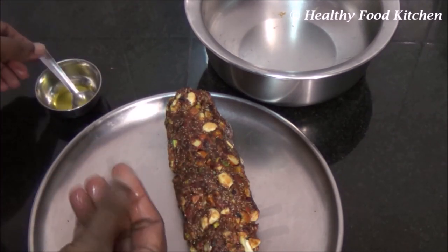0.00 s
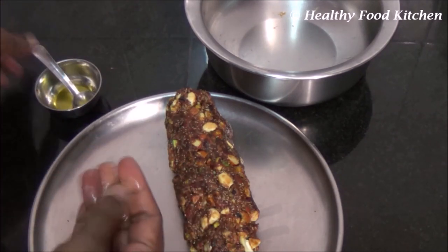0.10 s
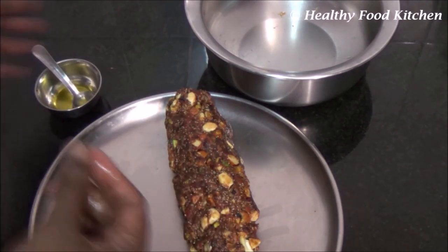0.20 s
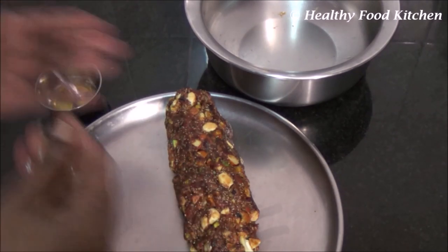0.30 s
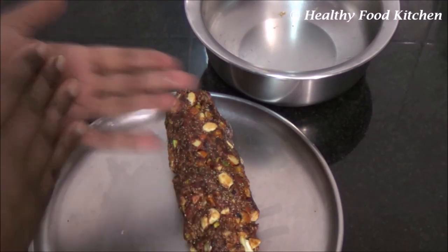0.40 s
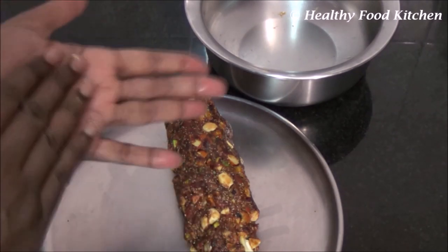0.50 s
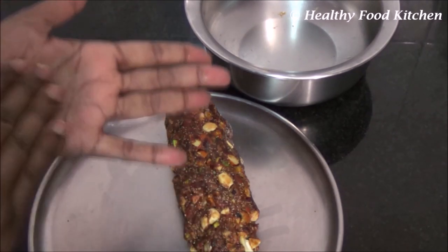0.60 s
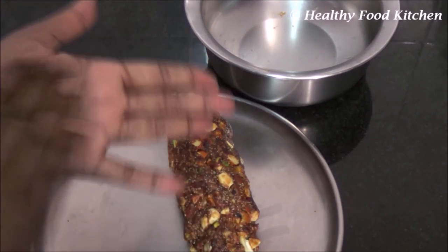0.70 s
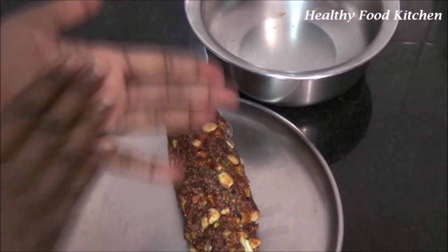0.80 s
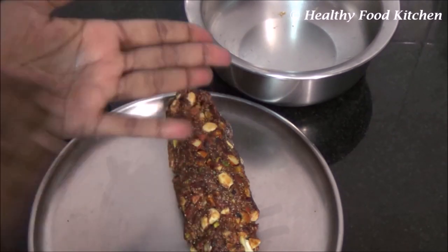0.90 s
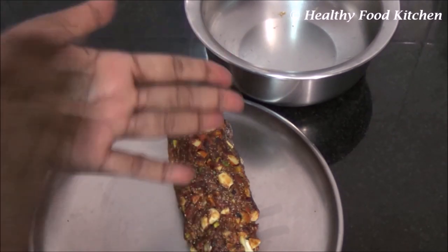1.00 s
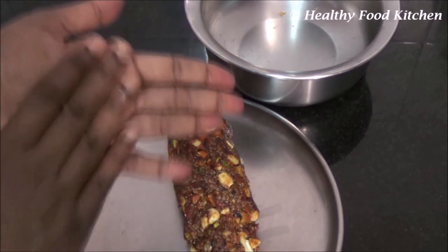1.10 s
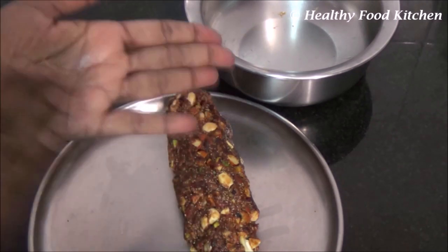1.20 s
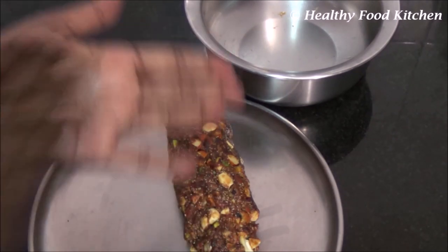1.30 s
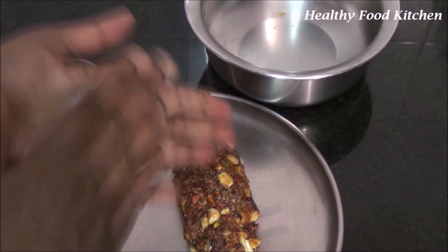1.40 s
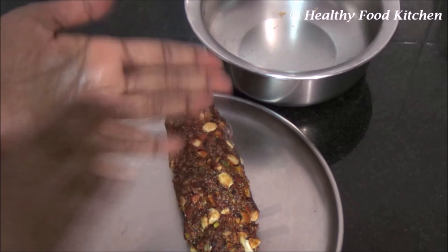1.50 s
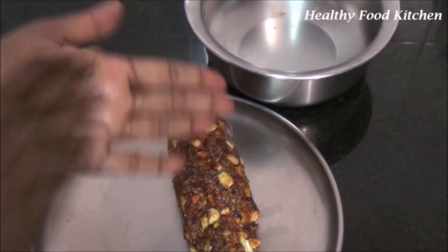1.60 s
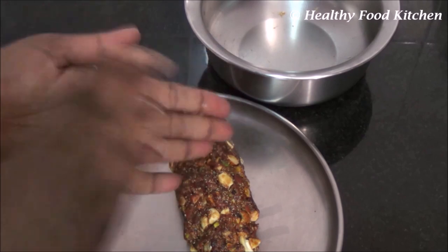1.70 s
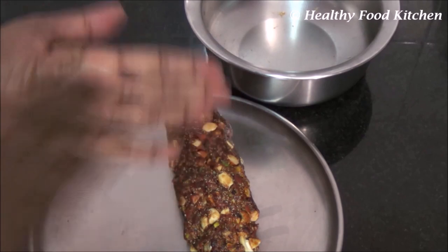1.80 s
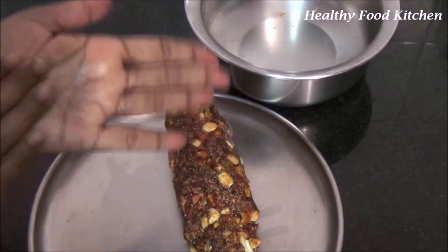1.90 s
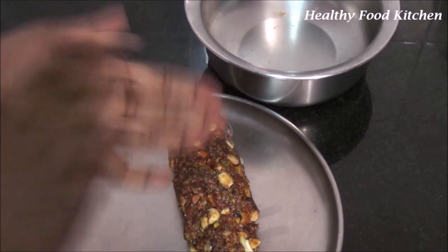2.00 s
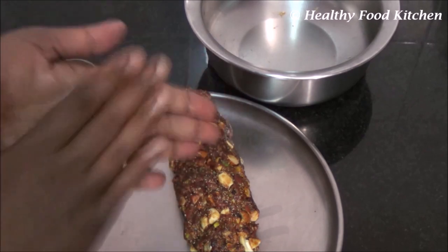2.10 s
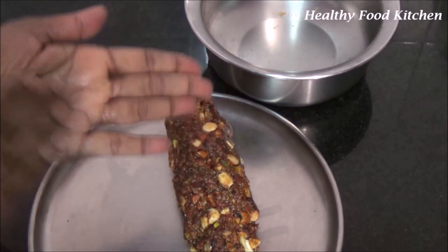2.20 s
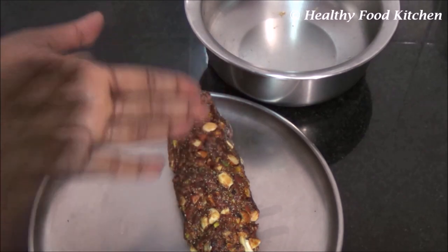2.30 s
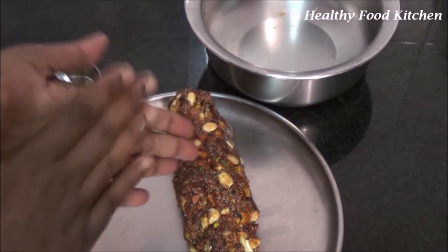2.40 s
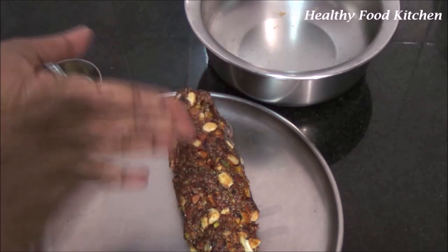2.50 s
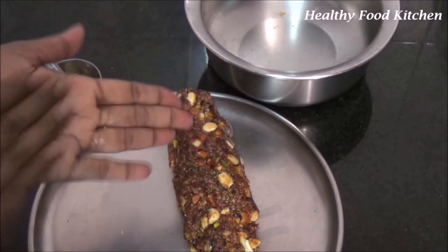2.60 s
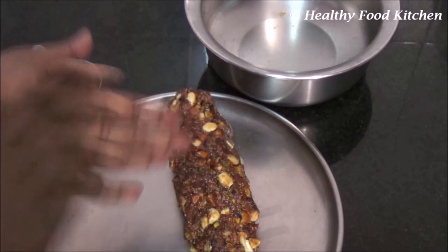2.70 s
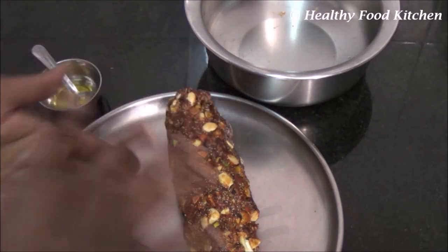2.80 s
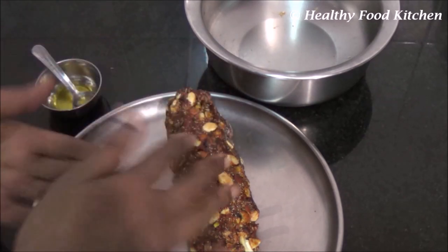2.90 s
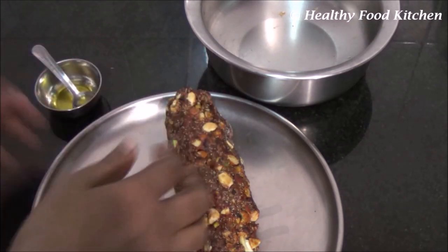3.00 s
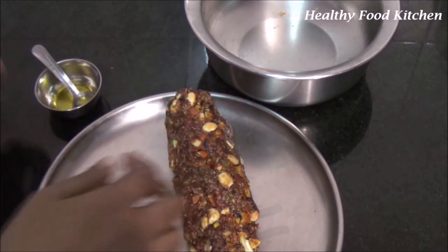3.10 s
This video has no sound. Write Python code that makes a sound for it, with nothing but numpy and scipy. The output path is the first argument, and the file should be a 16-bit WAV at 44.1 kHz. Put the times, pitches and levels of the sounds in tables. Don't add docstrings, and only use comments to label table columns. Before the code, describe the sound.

Two oiled palms rub together in quick strokes after one sharp click, over a low fridge hum.

```python
import sys
import numpy as np
from scipy import signal
from scipy.fft import rfft, irfft
from scipy.io import wavfile
from scipy.ndimage import uniform_filter1d

SR = 44100
rng = np.random.default_rng(int(sys.argv[2]) if len(sys.argv) > 2 else 0)


def elevation(decibels):
    levels = np.asarray(decibels, float)
    return 10 ** (levels / 20)


def persist_wave(psi):
    counts = np.round(np.clip(psi, -1, 1) * 32767).astype(np.int16)
    wavfile.write(sys.argv[1], SR, np.atleast_2d(counts).T)


N = 141120


def evened(x):
    return x / np.sqrt(np.mean(x ** 2) + 1e-20)


def read(points, hz):
    f, value = np.transpose(points)
    return np.interp(np.log(hz + 1), np.log(f + 1), value)


def slow(rate_hz):
    t = np.arange(0, N + 64, 64) / SR
    wave = 0
    for f in rate_hz * np.geomspace(.05, 1, num=24):
        wave = wave + np.sin(2 * np.pi * (f * t + rng.random())) / np.sqrt(f)
    return np.interp(np.arange(N) / SR, t, evened(wave))


def resonate(x, hz, width):
    turn = np.exp(2j * np.pi * np.cumsum(hz * np.ones(len(x))) / SR)
    r = np.exp(-np.pi * width / SR)
    return 2 * (turn * signal.lfilter([1 - r], [1, -r], x / turn + 1e-18)).real


def colour(x, points, patchy_db, streak_db):
    hz, _, z = signal.stft(x, SR, nperseg=512, noverlap=384)
    a, b = rng.standard_normal((2,) + z.shape[-2:])
    patches = evened(uniform_filter1d(uniform_filter1d(a, size=7, axis=0), size=12, axis=1))
    streaks = evened(uniform_filter1d(uniform_filter1d(b, size=2, axis=0), size=9, axis=1))
    gain = elevation(read(points, hz)[:, None] + patchy_db * patches + streak_db * streaks)
    return signal.istft(z * gain, SR, nperseg=512, noverlap=384)[1][..., :N]


def alike(a, b, points, hz):
    same = np.clip(read(points, hz), 0, 1).reshape((-1,) + (1,) * (a.ndim - 1))
    return np.array([a, same * a + np.sqrt(1 - same ** 2) * b])


# frequency in Hz, left-right likeness from 0 to 1.
BACKGROUND_SAME = [(40, 0.96), (150, 0.95), (400, 0.61), (900, 0.12), (2500, 0.29), (6000, 0.3),
                   (9000, .85), (13000, 0.93)]


def pair(points):
    hz = np.fft.rfftfreq(N, 1 / SR)
    a, b = rfft(rng.standard_normal((2, N)))
    return evened(irfft(alike(a, b, BACKGROUND_SAME, hz) * elevation(read(points, hz)), N))


# multiple of the shaft speed, rms level in dB, waver in dB.
ORDERS = [(1, -63.5, 1.2), (3, -73, 2.), (5, -71, 2.), (6, -48, 1.1), (7, -57, 2.2), (8, -72, 2.5),
          (27, -72, 1.5), (74, -71.5, 3.5)]
# frequency in Hz, rms level in dB, width in Hz.
WHINES = [(120, -66.5, 4.2), (278, -63, 21), (363.7, -67.5, 6.3), (458.6, -65, 17.5), (627, -68.5, 7.6),
          (778, -72.5, 2.9), (835, -71.5, 6.1), (940, -68.5, 18), (6400, -73, 60)]
# frequency in Hz, level in dB per Hz.
RUMBLE = [(22, -3), (40, -15), (62, 1), (85, -7.5), (130, -0.5), (230, -1), (400, -1), (600, -43)]
SHAFT_HZ, SHAFT_WANDER = 49.23, .0006
RUMBLE_DB = -57.5


def fridge():
    turns = np.cumsum(SHAFT_HZ * (1 + SHAFT_WANDER * slow(3.46))) / SR
    out = elevation(RUMBLE_DB) * pair(RUMBLE)
    for k, db, waver_db in ORDERS:
        level = np.sqrt(2) * elevation(db + waver_db * slow(16.))
        out += level * np.sin(2 * np.pi * (k * turns + rng.random()))
    for hz, db, width in WHINES:
        out += elevation(db) * evened(resonate(rng.standard_normal(N), hz, width))
    return out


def screen():
    screen_hz, screen_db = 15624, -75
    return elevation(screen_db) * np.sqrt(2) * np.sin(2 * np.pi * screen_hz * np.arange(N) / SR)


# frequency in Hz, level in dB per Hz.
AIR = [(240, -23), (480, -2), (950, -7), (1500, -10.5), (2700, -9.5), (4100, -15), (12500, -22),
       (15800, -26)]
AIR_DB = -53.5


def room_air():
    flat = [(100, 0), (9000, 0)]
    return elevation(AIR_DB) * colour(pair(AIR), flat, patchy_db=2.1, streak_db=1.35)


CRACKLE_DECAY_S, RING_DECAY_S = .0005, .0007
CLICK_LOW_HZ, CLICK_TOP_HZ = 2200, 13600


def clicks(rows, ring_db, low_share):
    t, out = np.arange(300) / SR, np.zeros(N)
    for s, peak_db, ring_hz in rows:
        edges = [max(CLICK_LOW_HZ, low_share * ring_hz), max(CLICK_TOP_HZ, 1.2 * ring_hz)]
        b, a = signal.butter(3, edges, "band", fs=SR)
        ring = elevation(ring_db) * np.sin(2 * np.pi * ring_hz * t) * np.exp(-t / RING_DECAY_S)
        crackle = .5 * rng.standard_normal(300) * np.exp(-t / CRACKLE_DECAY_S)
        out[round(s * SR):][:300] += elevation(peak_db) * signal.lfilter(b, a, ring + crackle)
    return out


# start in seconds, peak level in dB, ring in Hz.
TICKS = [
    (.116, -37, 10000),
    (.1165, -37, 7500),
    (.1275, -46, 14000),
    (.1835, -42, 10500),
    (.636, -39, 3720),
    (.642, -42, 6460),
    (.651, -42, 5000),
    (.658, -44, 8000),
    (3.1123, -37, 12100),
    (3.1135, -40, 9500),
]


def small_ticks():
    return clicks(TICKS, ring_db=-11, low_share=.6)


# start in seconds, peak level in dB, ring in Hz.
SNAP = [(.2230, -15, 12700), (.2234, -15.5, 12300), (.2232, -20, 7800), (.2236, -24, 6500),
        (.2237, -24, 5200), (.2238, -24, 3950), (.2241, -21.5, 2950), (.2245, -22, 9200),
        (.2286, -21, 12600), (.2289, -29, 6300), (.2351, -28, 12000), (.2352, -32, 14500),
        (.2353, -31, 7000)]
SNAP_S = SNAP[0][0]


def snap():
    left_db = .6
    return clicks(SNAP, ring_db=2.5, low_share=0) * elevation(left_db * np.array([[1], [-1]]))


def thump():
    thump_db, thump_hz, decay_s = -40, 890, 0.0022
    t = np.maximum(np.arange(N) / SR - SNAP_S, 0)
    return elevation(thump_db) * np.sin(2 * np.pi * thump_hz * t) * np.exp(-t / decay_s)


# frequency in Hz, level in dB, time to fall 60 dB in seconds.
STEEL = [(520, -54.5, 0.39), (700, -57, 0.11), (734, -44, 0.35), (910, -51.5, 0.69), (1210, -57, 0.27),
         (2150, -62, 0.71), (2500, -48.5, 0.6), (2810, -52, 0.87), (3800, -41.5, 0.12), (7760, -58, 0.19),
         (9000, -54, 0.19), (10300, -52, .35), (12100, -45, 0.34), (12590, -51, .3)]
STEEL_RISE_S, STEEL_BLUR_HZ, BLUR_DOUBLES_HZ = 0.001, 39, 2500


def steel():
    t, out = np.arange(SR // 2) / SR, np.zeros((2, N))
    for hz, db, t60 in STEEL:
        width = STEEL_BLUR_HZ * (1 + hz / BLUR_DOUBLES_HZ)
        envelope = elevation(db - 60 * t / t60) * (1 - np.exp(-t / STEEL_RISE_S))
        for side in out:
            cluster = evened(resonate(rng.standard_normal(len(t)), hz, width))
            side[round(SNAP_S * SR):][:len(t)] += envelope * cluster
    return out + .5 * out[::-1]


# frequency in Hz, level in dB.
SNAP_TAIL = [(300, -5), (800, -34), (1500, -18), (2600, -4.5), (5000, -7.5), (10500, 5.5), (13000, 7),
             (15500, -12)]


def snap_burst():
    impulse = np.arange(N) == round(SNAP_S * SR)
    return irfft(rfft(impulse) * elevation(read(SNAP_TAIL, np.fft.rfftfreq(N, 1 / SR))), N)


# frequency in Hz, time to fall 60 dB in seconds.
ROOM_DECAY = [(300, 0.28), (760, 0.3), (1400, 0.32), (2600, 0.61), (4500, 0.37), (9000, 0.37),
              (15000, 0.18)]
# frequency in Hz, level in dB.
ROOM_TONE = [(300, -40), (760, 4), (1400, 6.5), (2600, -0.5), (4500, -2), (10000, -5), (15000, -14)]
# frequency in Hz, left-right likeness from 0 to 1.
ROOM_SAME = [(500, 0.081), (2000, 0.36), (5000, 0.72), (9000, 0.48), (13000, 0.82)]
ROOM_GRAIN_DB = 1.


def room(x):
    length = SR // 2
    grain = evened(uniform_filter1d(rng.standard_normal(length), size=90))
    gap = np.arange(length) > 60
    noise = rng.standard_normal((2, length)) * gap * elevation(ROOM_GRAIN_DB * grain)
    hz, t, (a, b) = signal.stft(noise, SR, nperseg=256)
    fall_db = read(ROOM_TONE, hz)[:, None] - 60 * t / read(ROOM_DECAY, hz)[:, None]
    tail = signal.istft(alike(a, b, ROOM_SAME, hz) * elevation(fall_db), SR, nperseg=256)[1]
    return signal.fftconvolve(x[None], tail / np.linalg.norm(tail[0]), axes=1)[:, :N]


# middle in seconds, half length in seconds, speed in dB.
STROKES = [(0.768, 0.034, -59), (0.874, 0.038, -56), (.93, 0.023, -52), (1.037, 0.041, -49.5),
           (1.168, 0.054, -49), (1.241, 0.028, -47.5), (1.347, 0.046, -49.5), (1.41, .03, -57),
           (1.466, 0.03, -51.5), (1.543, 0.04, -43.5), (1.636, 0.035, -42.5), (1.7, 0.032, -46),
           (1.785, 0.062, -51), (1.874, 0.041, -46.5), (2.007, 0.042, -41.5), (2.183, 0.048, -44),
           (2.344, 0.048, -43.5), (2.445, .04, -60), (2.526, 0.053, -46), (2.693, 0.045, -46),
           (2.81, 0.028, -56), (2.88, 0.044, -49.5), (2.959, 0.026, -52)]
# frequency in Hz, level in dB per Hz.
SKIN = [(900, -26), (1900, -11.5), (3700, -8.5), (6000, -5.5), (8300, -6.5), (11300, 0), (13800, -7),
        (15800, -11)]
# middle in seconds, half length in seconds, level in dB,
# early pitch in Hz, late pitch in Hz.
CUPS = [(0.918, 0.059, -65, 2500, 2820), (1.038, 0.045, -65.5, 3370, 3770), (1.21, 0.019, -57, 5900, 5530),
        (1.226, 0.017, -54.5, 3170, 2300), (1.318, 0.042, -57.5, 2900, 3870),
        (1.397, 0.019, -61, 5940, 6000), (1.48, 0.013, -54, 5760, 6000), (1.55, .025, -59, 5250, 5400),
        (1.605, 0.017, -50.5, 3040, 3650), (1.644, 0.033, -55, 3930, 4000), (1.76, 0.04, -56.5, 4960, 4170),
        (1.873, 0.042, -63, 2260, 2100), (1.992, 0.011, -45, 4000, 3800), (2.011, 0.008, -62, 1920, 1900),
        (2.038, 0.011, -56, 4220, 4520), (2.21, 0.025, -66.5, 5250, 5360), (2.258, .04, -60.5, 2640, 3340),
        (2.33, 0.019, -45.5, 3500, 4680), (2.444, 0.019, -54.5, 4230, 4300),
        (2.671, 0.039, -52.5, 2880, 3720), (2.733, 0.0089, -63, 2900, 3220),
        (2.918, 0.011, -59, 2820, 2840), (2.936, 0.024, -55.5, 4100, 3460)]
SLIPS_PER_S, SLIP_SPREAD_DB, STROKE_END_DB = 14000, 0.5, -7
PATCHY_DB, STREAK_DB = 1.8, 2.
CUP_WIDTH_HZ, CUP_WOBBLE, CUP_END_DB = 950, .04, -8
CUP_OVERTONE, CUP_OVERTONE_HZ, CUP_OVERTONE_DB = 1.65, 2500, -3


def hollow(slips, hz, width):
    return evened(resonate(resonate(slips, hz, width), hz, width))


def palms():
    t, out = np.arange(N) / SR, np.zeros(N)
    spread = elevation(SLIP_SPREAD_DB * np.minimum(rng.exponential(1, N), 5))
    slips = rng.standard_normal(N) * spread * (rng.random(N) < SLIPS_PER_S / SR)
    skin = evened(colour(slips, SKIN, PATCHY_DB, STREAK_DB))
    wobble = slow(39.76)
    for middle, half, speed_db in STROKES:
        out += elevation(speed_db + STROKE_END_DB * ((t - middle) / half) ** 2) * skin
    for middle, half, db, early_hz, late_hz in CUPS:
        part = slice(round((middle - 3 * half) * SR), round((middle + 3 * half) * SR))
        u = (t[part] - middle) / half
        glide = early_hz + (late_hz - early_hz) * (1 + np.tanh(u)) / 2
        hz = glide * (1 + CUP_WOBBLE * wobble[part])
        cup = hollow(slips[part], hz, CUP_WIDTH_HZ)
        overtone = hollow(slips[part], CUP_OVERTONE * hz, CUP_OVERTONE_HZ)
        out[part] += elevation(db + CUP_END_DB * u ** 2) * (cup + elevation(CUP_OVERTONE_DB) * overtone)
    return out


# middle in seconds, half length in seconds, level in dB, pitch in Hz.
GROANS = [
    (1.647, 0.031, -60, 121),
    (2, 0.12, -62, 120),
    (2.584, 0.11, -56.5, 119),
]


def groans():
    t, out = np.arange(N) / SR, np.zeros(N)
    for middle, half, db, hz in GROANS:
        swell = np.sqrt(2) * elevation(db - 5.7 * ((t - middle) / half) ** 2)
        out += swell * np.sin(2 * np.pi * hz * t)
    return out


SNAP_WET_DB, RUB_WET_DB, TICK_WET_DB = 2, -4.5, -7


def scene():
    background = fridge() + screen() + room_air() + groans()
    ticks, rub = small_ticks(), palms()
    sent = elevation(RUB_WET_DB) * rub + elevation(SNAP_WET_DB) * snap_burst() + elevation(TICK_WET_DB) * ticks
    return background + ticks + snap() + thump() + steel() + rub + room(sent)


def roll_off(x):
    return signal.sosfilt(signal.butter(12, 16810, fs=SR, output="sos"), x)


EDGE_HZ, LOUD_EDGE_HZ = 15760, 16600
LOUD_DB, LOUD_TOP_DB = -29, -7


def record(dry):
    limited = signal.oaconvolve(dry, signal.firwin(1201, EDGE_HZ, fs=SR)[None], "same")
    wide = signal.oaconvolve(dry, signal.firwin(401, LOUD_EDGE_HZ, fs=SR)[None], "same")
    power = uniform_filter1d((dry ** 2).mean(0), size=60)
    loud = uniform_filter1d(1. * (power > elevation(2 * LOUD_DB)), size=60)
    return roll_off(limited + elevation(LOUD_TOP_DB) * loud * (wide - limited))


dry = scene()
out = record(dry)
persist_wave(out)
```